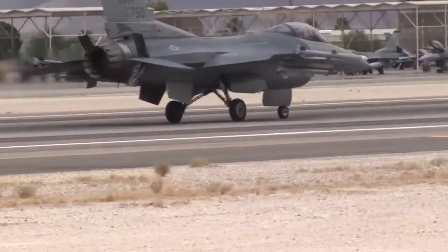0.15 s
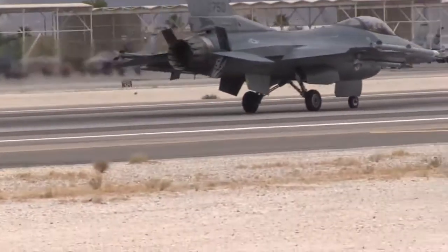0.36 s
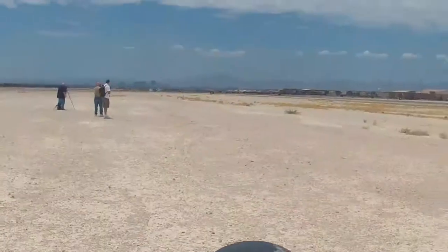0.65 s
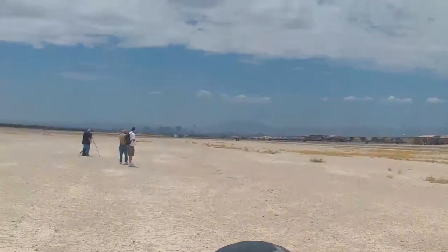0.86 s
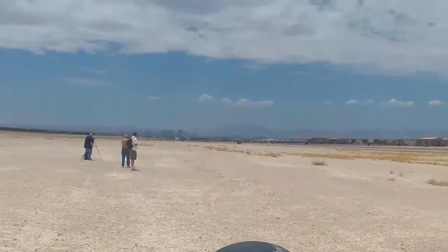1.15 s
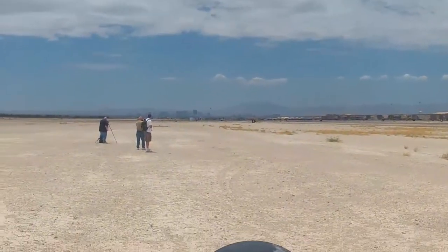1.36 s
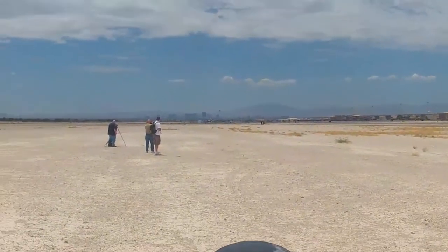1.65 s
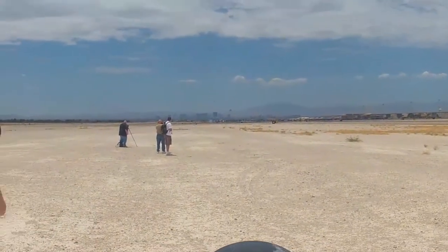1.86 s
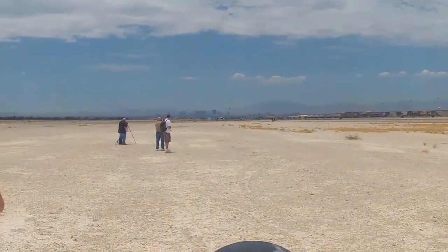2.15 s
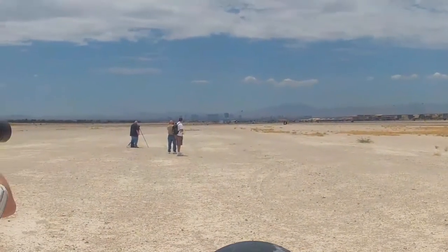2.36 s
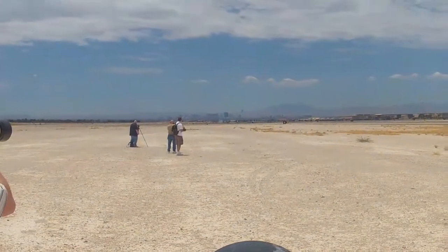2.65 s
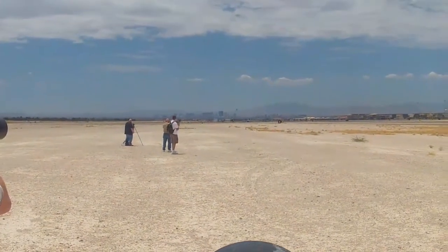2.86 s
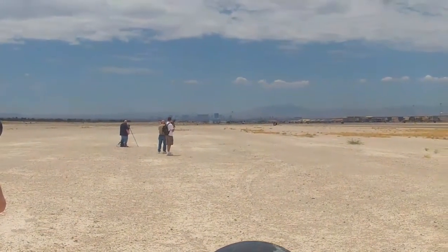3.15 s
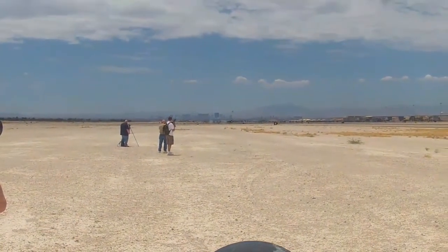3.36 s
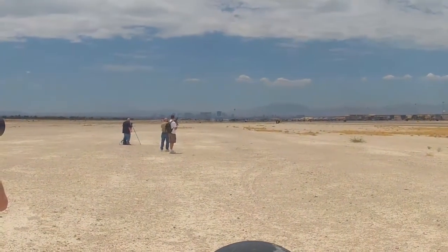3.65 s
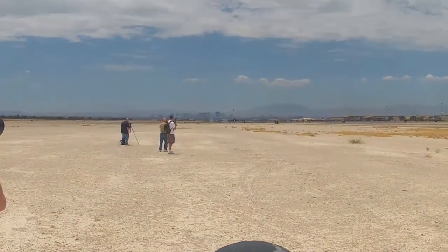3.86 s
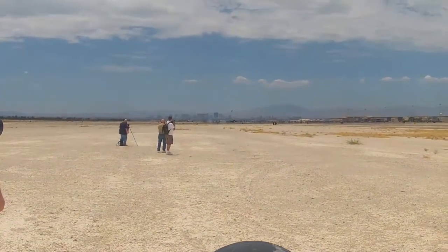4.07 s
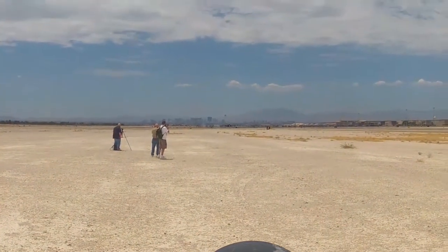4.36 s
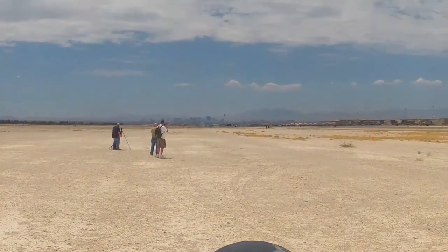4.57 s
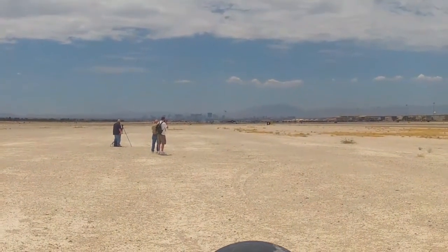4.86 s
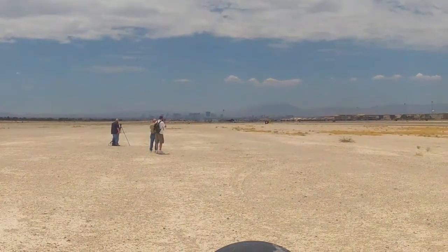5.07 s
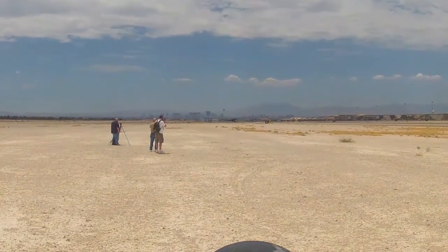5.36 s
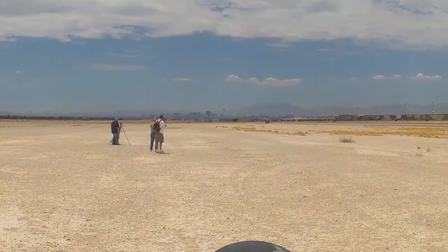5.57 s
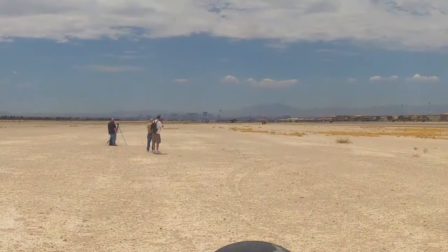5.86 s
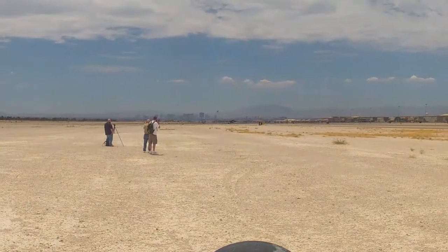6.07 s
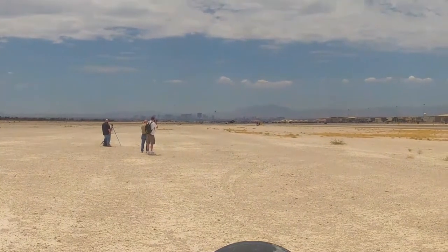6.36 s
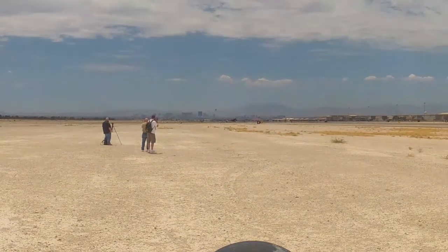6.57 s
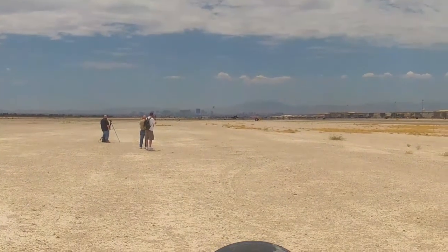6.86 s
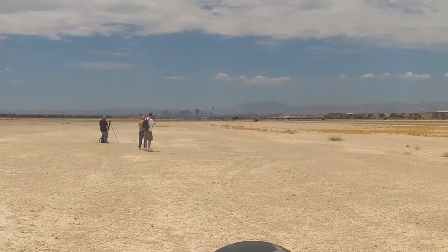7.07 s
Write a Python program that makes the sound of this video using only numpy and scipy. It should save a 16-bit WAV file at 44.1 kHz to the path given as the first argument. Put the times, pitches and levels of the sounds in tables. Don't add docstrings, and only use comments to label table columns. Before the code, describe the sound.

A close jet fighter's roaring, whining half-second roll-past cuts abruptly to quiet airfield rumble, with finger taps on a camera case and a final loud catch snap.

```python
import sys
import numpy as np
from scipy import signal
from scipy.fft import rfft, irfft, next_fast_len
from scipy.io import wavfile
from scipy.ndimage import uniform_filter1d, map_coordinates

SR = 44100
rng = np.random.default_rng(int(sys.argv[2]) if len(sys.argv) > 2 else 0)


def level_to_linear(level):
    exponent = np.asarray(level, float) / 20
    return 10 ** exponent


def file_out(sig):
    cols = np.atleast_2d(sig).T
    lim = np.clip(cols, -1, 1)
    pcm = np.round(lim * 32767).astype(np.int16)
    wavfile.write(sys.argv[1], SR, pcm)


N = 317961
T = np.arange(N) / SR

JET_END_S, FIELD_START_S = .4476, .4585

# time_s, rise_db, half_length_s
FAN_SWELLS = [(.09, 9.5, 0.073), (.3, 6.5, 0.036), (.415, 4.5, 0.075)]
COMPRESSOR_SWELLS = [(.05, -10, .03), (.125, 9, 0.016), (.152, -6, .01), (.24, 4, .035), (.425, 6.5, .025)]
# time_s, rise_db
TURBINE_PUFFS = [(0.069, 3.5), (.145, 7), (.31, 1.5), (.392, 6), (.432, 5)]
# frequency_hz, density_db_per_hz
EXHAUST_SPECTRUM = [(40, -54), (100, -14.5), (190, -3), (245, 2.5), (330, -7.5), (440, -8.5), (560, -13.5),
                    (630, -6), (740, -16), (825, -9.5), (980, -24), (1300, -14), (2400, -69)]
INTAKE_SPECTRUM = [(600, -39), (950, -8.5), (1300, -8.5), (2200, -9), (3300, -12), (4000, -10.5),
                   (4190, -3), (4400, -11), (4900, -8.5), (5100, -14), (5600, -21), (7000, -41)]
TURBINE_SPECTRUM = [(4600, -34), (5100, -6.5), (5700, -1.5), (7400, -8), (8700, -7.5), (10000, -17),
                    (11000, -35), (12000, -60)]
# frequency_hz, likeness_0_to_1
PORT_LIKENESS = [(60, 1), (130, 1), (290, 0.98), (640, 0.75), (1410, 0.82), (3100, 0.76), (6820, 1),
                 (15000, 0.99)]
# frequency_hz, left_minus_right_db
PORT_LEVEL = [(60, -6), (110, -5.5), (200, -4), (380, -3.5), (700, -5), (1290, -1.0), (2380, -0.5),
              (4400, 1), (8120, -0.5), (15000, 0)]
# frequency_hz, left_lead_rad
PORT_LEAD = [(100, -0.49), (900, 0.18), (1800, 0.23), (4000, 0.38), (6000, -0.0061)]

# start_s, peak_db, low_part_db
NAIL_TICKS = [(.4923, -30.5, -11), (.6105, -32.5, 2), (.7547, -44.5, -19), (1.1874, -56, -4),
              (1.2775, -38, 2), (1.3997, -28, -9), (1.8063, -44, 13), (3.3544, -39, 10), (3.4481, -43, -12),
              (4.633, -30, 1), (6.0985, -41, 6)]
FINGERTIP_TAPS = [(1.474, -42.5, 13), (1.536, -51.5, 19.5), (1.5604, -42.5, 14.5), (1.6023, -43.5, 16),
                  (1.6844, -53, 14), (1.7044, -41.5, 14), (1.7315, -43, 8), (1.7529, -45.5, 24),
                  (2.3794, -42, 9), (2.4548, -49.5, 15.5), (3.1344, -42, 15), (3.3722, -40, 6),
                  (3.4675, -38.5, 14.5), (4.5544, -53, 21)]
FINGER_PATS = [(.5611, -42, 13), (1.4217, -63, 20), (2.7694, -54, 25), (3.1193, -48.5, 23.5),
               (4.6733, -46, 15), (6.9604, -44.5, 16)]
RUB_SLIPS = [(1.862, -41, 13), (1.871, -34.5, 10.5), (1.883, -33, 5), (1.892, -37, 14),
             (1.903, -36.5, 14.5), (1.914, -42, 12), (1.931, -33, 10), (1.944, -39.5, 17)]
HAND_HEEL = [(.5915, -35.5, 20)]
CATCH_SNAP = [
    (7.1345, -38, 0),
    (7.1415, -4.5, -2.5),
]
CATCH_REBOUND = [
    (7.1465, -20.5, 2),
    (7.1528, -13.5, -0.5),
    (7.161, -41, 16),
]
CATCH_SCRAPE = [
    (7.19, -22, -11),
    (7.197, -14, 0),
    (7.203, -19.5, -2),
]
# start_s, level_db, deepest_modes_db
CASE_KNOCKS = [(0.5902, -15.5, -9.5), (1.698, -30.5, -8.5), (3.521, -27.5, -2.5), (5.164, -41, 6.5)]
# frequency_hz, level_db, t60_s
CASE_MODES = [(224.4, 2.5, 0.19), (341, -5, 0.23), (489, 5.5, 0.037), (725, 1.5, 0.027), (935, -36, 0.061)]
# frequency_hz, width_hz, level_db
SHELL_MODES = [(1435, 230, -1.5), (1500, 103, 4.5), (1650, 150, 6), (1940, 250, 3), (2780, 390, -7),
               (3330, 270, -2.5), (3990, 280, -9.5), (4640, 350, -16.5)]
CATCH_MODES = [(1517, 126, -0.5), (1730, 120, 5), (2040, 67, -2), (2270, 420, -7.5), (3470, 340, -5),
               (3760, 190, -1.5), (4580, 250, -10), (5280, 520, -22.5)]
# frequency_hz, level_db
BODY_MODES = [(385, -5.5), (485, -3), (590, -8.5), (720, -1.5), (785, 2.5), (960, -12)]
HELD_BODY_MODES = [(365, -10), (455, -4.5), (580, -1), (715, -4), (900, -5.5), (1100, -13)]

# time_s, level_db
MOTOR_LOAD = [(1.97, -43.5), (2.47, -46.5), (2.7, -44), (3.5, -47), (4.45, -42.5), (5.09, -45.5),
              (5.6, -46), (6.2, -43.5), (6.55, -44), (6.85, -49), (7.1, -45.5)]

# frequency_hz, density_db_per_hz
RUMBLE_SPECTRUM = [(11, -52), (18, -6), (71, 0.5), (86, 1), (103, -1.5), (187, -4.5), (237, -5), (264, -17),
                   (300, -12), (390, -18), (660, -120)]
FAR_JET_SPECTRUM = [(180, -11.5), (260, 2.5), (420, -2.5), (600, -6.5), (720, -7.5), (800, -8),
                    (900, -18.5), (1150, -27.5), (1700, -21), (2100, -65)]
HISS_SPECTRUM = [(700, -47), (1000, -16), (1300, -22.5), (1800, -18), (2700, -16.5), (3800, -27),
                 (4700, -37.5), (5500, -38.5), (6000, -47)]
# frequency_hz, width_hz, over_hiss_db
CASE_CAVITY = [(2148, 46, 19), (3332, 120, 15), (4267, 163, 11.5)]
# frequency_hz, level_db
ENGINE_ORDERS = [(80, -6), (238, -2.5), (320, -2.5), (400, -9)]
# time_s, rise_db, half_length_s
RUMBLE_SWELLS = [(1.6, 2, 0.19), (2.3, 1.5, 0.35), (4.18, 2.5, 0.23), (5.1, 2, 0.34)]
FAR_JET_SWELLS = [(3.9, 1.5, 0.2), (6.14, 3, 0.27), (6.9, 1.5, 0.4), (7.24, 0, 0.12)]
ROTOR_SLAP_SWELLS = [(.5, -3, 1), (5.5, 4, 0.63), (6.05, -4.5, 0.18), (7.1, 3, 0.62)]
ENGINE_REVS = [
    (6.2, 21, .2),
    (6.8, 25.7, 0.26),
]


def jet():
    eddies = wobble(60.3)
    exhaust_db = -15.5 + 1.4 * eddies
    intake_db = -21 + 4 * np.minimum(T, JET_END_S) + 0.4 * eddies
    puffs_db = swells([(s, db, 0.019) for s, db in TURBINE_PUFFS])
    turbine_db = -33.5 + puffs_db + 2.7 * eddies
    pair = level_to_linear(exhaust_db) * rush(EXHAUST_SPECTRUM, patchy_db=0.07, channels=2)
    pair += level_to_linear(intake_db) * rush(INTAKE_SPECTRUM, patchy_db=0.4, channels=2)
    pair += level_to_linear(turbine_db) * rush(TURBINE_SPECTRUM, patchy_db=-1.0, channels=2)
    blades = tone(2637, -32.5 + swells(FAN_SWELLS), drift=.15)
    blades += tone(4173, -30.5 + swells(COMPRESSOR_SWELLS), drift=.16)
    return at_ports(pair, blades)


def at_ports(pair, blades):
    def spread(hz):
        angle = np.arccos(np.clip(along(PORT_LIKENESS, hz), 0, 1)) / 2
        return np.array([np.cos(angle), np.sin(angle)])

    def lean(hz):
        left = level_to_linear(along(PORT_LEVEL, hz) / 2) * np.exp(.5j * along(PORT_LEAD, hz))
        return np.array([left, 1 / left])

    mid, side = filtered(pair, spread)
    return filtered(np.array([mid + side, mid - side]) + blades, lean)


def handling():
    def case(events, **kind):
        return contacts(events, SHELL_MODES, BODY_MODES, ring_s=0.038, **kind)

    def catch(events, **kind):
        return contacts(events, CATCH_MODES, HELD_BODY_MODES, ring_s=0.017, **kind)

    fingers = case(NAIL_TICKS, hold_s=.0022, t60_s=.015, tilt_db=-3, strike=45)
    fingers += case(FINGERTIP_TAPS, hold_s=0.0032, t60_s=0.022, tilt_db=3.5)
    fingers += case(FINGER_PATS, hold_s=0.0029, t60_s=0.028, tilt_db=-6)
    fingers += case(RUB_SLIPS, hold_s=0.0088, t60_s=0.044, tilt_db=-3.5)
    fingers += case(HAND_HEEL, hold_s=0.0044, t60_s=0.024, tilt_db=-6.5)
    metal = catch(CATCH_SNAP, hold_s=.006, t60_s=.016, tilt_db=-1.3, strike=45)
    metal += catch(CATCH_REBOUND, hold_s=0.0082, t60_s=0.019, tilt_db=-0.5)
    metal += catch(CATCH_SCRAPE, hold_s=0.0079, t60_s=.03, tilt_db=17)
    return fingers + metal + knocks()


def contacts(events, shell, body, ring_s, hold_s, t60_s, tilt_db, strike=0):
    case, t = np.zeros(N + SR), T[:SR // 8]
    body_hz, body_db = np.transpose(body)
    tilted_db = body_db + tilt_db * np.log2(body_hz / 640)

    def thin(hz):
        return resonances(shell)(hz) / (1 + (0.59 * shell[0][0] / (hz + 1)) ** 12)

    push = strike * (np.arange(len(t)) == 4)
    blow = push - .92 * np.roll(push, 1)
    for s, db, low_db in events:
        brief = level_to_linear(-0.02 * (db + 40.5))
        after = np.maximum(t - hold_s * brief ** 2, 0)
        t60 = t60_s * brief
        grit = level_to_linear(-60 * after / t60) * (1 - np.exp(-t / 0.00012)) * rng.standard_normal(len(t))
        tick = filtered(grit + blow, thin)
        strength = level_to_linear(tilted_db + rng.normal(0, 1.5, len(body)))
        phase = rng.random((len(body), 1))
        modes = strength @ np.sin(2 * np.pi * (np.outer(body_hz, t) + phase))
        thud = level_to_linear(-60 * after / (t60 + ring_s)) * (1 - np.exp(-t / 0.00038)) * modes
        touch = tick / abs(tick).max() + level_to_linear(low_db - 5.5) * thud / abs(thud).max()
        case[round(s * SR):][:len(t)] += level_to_linear(db + 2.5) * touch
    return case[:N]


def knocks():
    out, t = np.zeros(N + SR), T[:SR // 8]
    for s, db, deep_db in CASE_KNOCKS:
        ring = 0
        for hz, level, t60 in CASE_MODES:
            mode_db = level + deep_db * (hz < 400) - 60 * t / t60
            ring = ring + level_to_linear(mode_db) * np.sin(2 * np.pi * hz * t)
        out[round(s * SR):][:len(t)] -= level_to_linear(db) * ring * (1 - np.exp(-t / 0.0027))
    return out[:N]


def motor():
    running = np.clip((T - 1.92) / 0.014, 0, 1)
    load_db = np.interp(T, *np.transpose(MOTOR_LOAD))
    starting_db = -6 * np.exp(-np.maximum(T - 1.95, 0) / .4)
    low_db = load_db / 2 - 25.5 + starting_db + 0.73 * wobble(3.85)
    hum = tone(775, load_db + 1.5 * wobble(6)) + tone(500, low_db) + tone(1775, -69.5)
    spin_db = -59 - 480 * np.maximum(abs(T - 2) - .05, 0)
    return running * hum + tone(580, spin_db, drift=0.37)


def airfield():
    return rumble() + far_jets() + engine() + case_hiss()


def rumble():
    since = np.maximum(T - FIELD_START_S, 0)
    level_db = -36.5 - 4.5 * np.exp(-(since / 0.92) ** 2) + swells(RUMBLE_SWELLS)
    return level_to_linear(level_db + 0.78 * wobble(7.8)) * rush(RUMBLE_SPECTRUM, patchy_db=-0.14)[0]


def far_jets():
    since = np.maximum(T - FIELD_START_S, 0)
    level_db = -45.5 - 2 * np.exp(-(since / 1.07) ** 2) + 0.62 * since + swells(FAR_JET_SWELLS)
    rotor_hz, slap_s = 17.22, 4.9925
    beat = (1 + np.cos(2 * np.pi * rotor_hz * (T - slap_s))) ** 2 / 2 - .75
    slap_db = (2 + swells(ROTOR_SLAP_SWELLS)) * beat
    return level_to_linear(level_db + slap_db + 0.34 * wobble(18)) * rush(FAR_JET_SPECTRUM, patchy_db=0.6)[0]


def engine():
    level_db = -64.5 + swells(ENGINE_REVS)
    return sum(tone(hz, db + level_db + 2 * wobble(5.1), drift=0.25) for hz, db in ENGINE_ORDERS)


def case_hiss():
    def cavity(hz):
        return np.sqrt(1 + sum(level_to_linear(2 * db) / (1 + (2 * (hz - c) / w) ** 2) for c, w, db in CASE_CAVITY))

    hiss = unit(filtered(rush(HISS_SPECTRUM, patchy_db=2.0)[0], cavity))
    return level_to_linear(-50.5 + 1.3 * wobble(3.13)) * hiss


def rush(spectrum, patchy_db, channels=1):
    z = signal.stft(rng.standard_normal((channels, N)), nperseg=512)[2]
    field = uniform_filter1d(rng.standard_normal(z.shape[1:]), size=6, axis=0)
    field = uniform_filter1d(field, size=10, axis=1)
    noise = signal.istft(z * level_to_linear(patchy_db * unit(field)), nperseg=512)[1][:, :N]
    return unit(filtered(noise, lambda hz: level_to_linear(along(spectrum, hz))))


def tone(hz, db, drift=0):
    phase = 2 * np.pi * np.cumsum(hz + 0 * T) / SR
    return np.sqrt(2) * level_to_linear(db) * np.sin(phase + drift * wobble(25))


def resonances(modes):
    def response(f):
        total = 0
        for k, (c, w, db) in enumerate(modes):
            total = total + (-1) ** k * level_to_linear(db) * 1j * f * w / (c * c - f * f + 1j * f * w)
        return total
    return response


def swells(rows):
    return sum(db * np.exp(-((T - s) / half) ** 2) for s, db, half in rows)


def wobble(rate):
    return map_coordinates(rng.standard_normal(int(N * rate / SR) + 4), [T * rate])


def filtered(x, response):
    n = x.shape[-1]
    m = next_fast_len(n + 8192)
    return irfft(rfft(x, m) * response(np.fft.rfftfreq(m, 1 / SR)), m)[..., :n]


def along(points, hz):
    f, v = np.transpose(points)
    return np.interp(np.log(hz + 1), np.log(f + 1), v)


def unit(x):
    return x / np.sqrt(np.mean(x ** 2) + 1e-20)


def scene():
    fade_out = np.clip((JET_END_S - T) / 0.00062, 0, 1)
    fade_in = level_to_linear(-19.5) + (1 - level_to_linear(-24)) * np.clip((T - FIELD_START_S) / 0.0045, 0, 1)
    field = airfield() + motor() + handling()
    return jet() * fade_out + field * fade_in * (T > JET_END_S)


def band_limit(x):
    return signal.sosfilt(signal.butter(12, 16080, fs=SR, output="sos"), x)


def record(dry):
    limited = dry / (1 + abs(dry / 1.04) ** 4) ** (1 / 4)
    first = filtered(limited * (T <= JET_END_S), lambda hz: np.clip((11050 - hz) / 100, 0, 1))
    hold_hz = 12000
    slow = filtered(dry * (T > JET_END_S), lambda hz: (hz < hold_hz / 2) / np.sqrt(1 + (hz / 5500) ** 30))
    sampled = slow * (1 + 2 * np.cos(2 * np.pi * hold_hz * T))
    held = filtered(sampled, lambda hz: np.sinc(hz / hold_hz) * np.clip((15450 - hz) / 200, 0, 1))
    return band_limit(first + held)


dry = scene()
out = record(dry)
file_out(out)
```